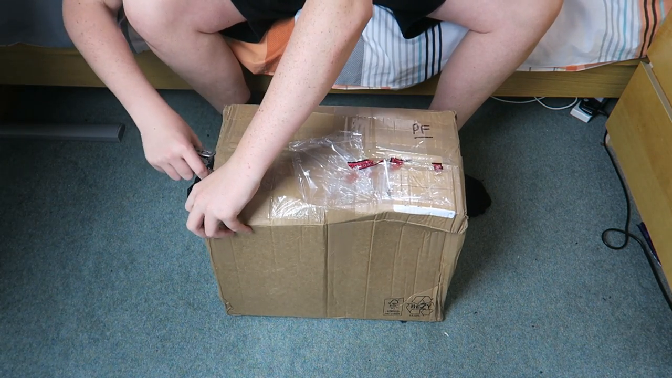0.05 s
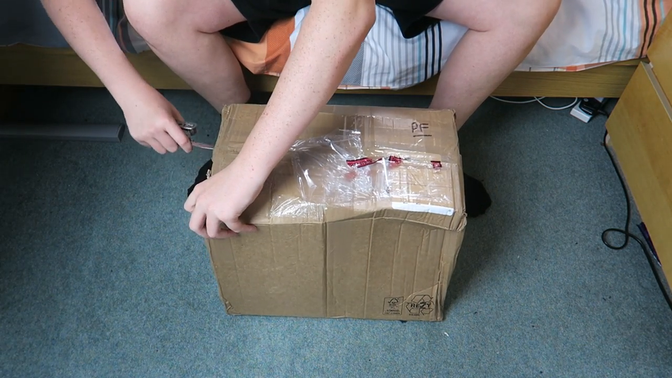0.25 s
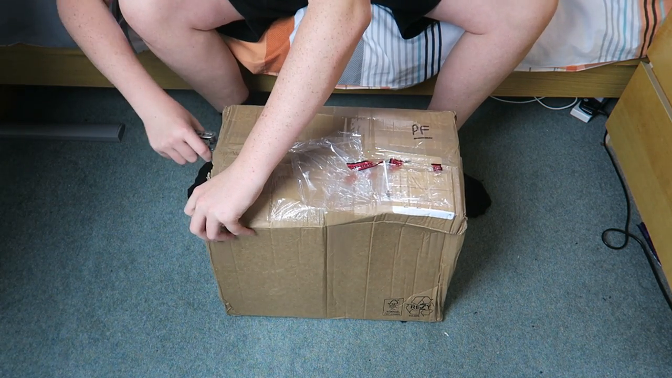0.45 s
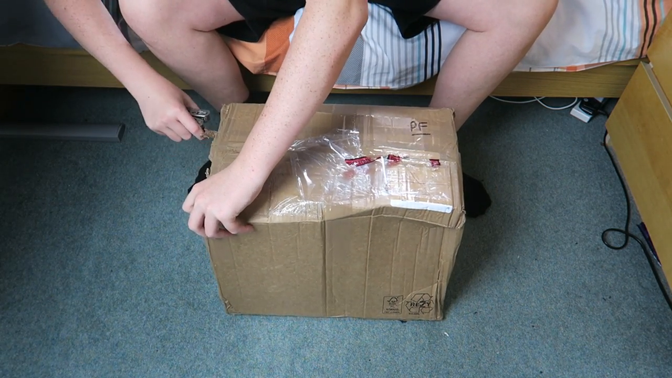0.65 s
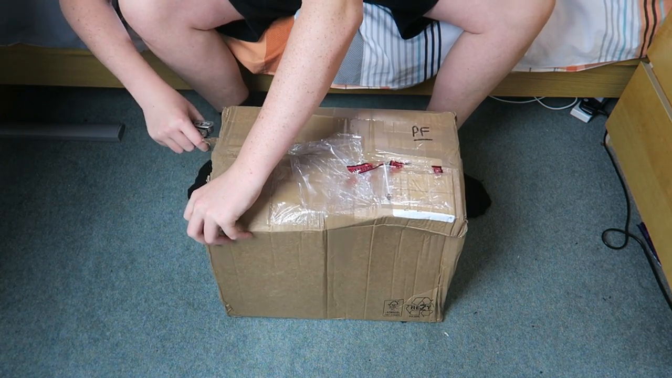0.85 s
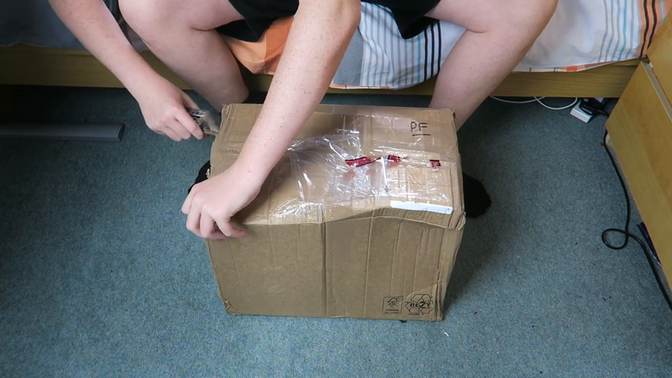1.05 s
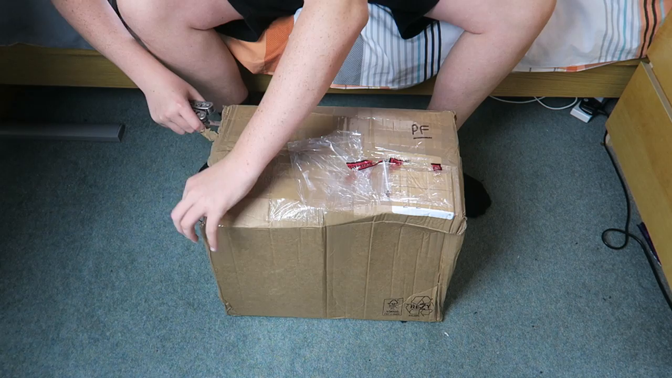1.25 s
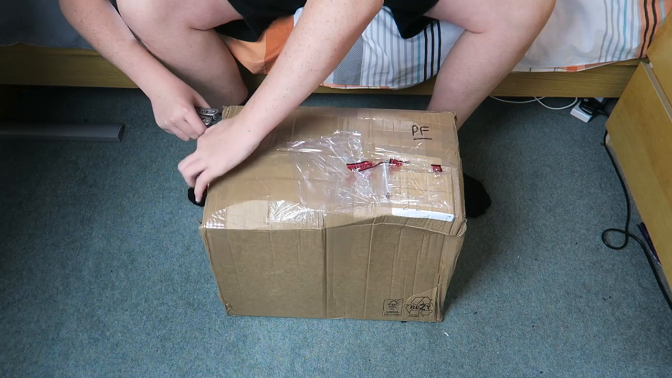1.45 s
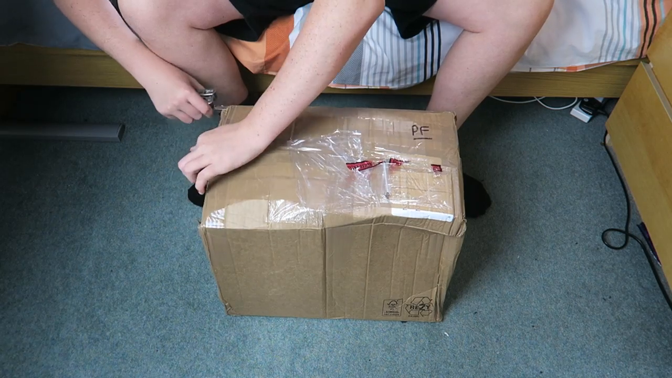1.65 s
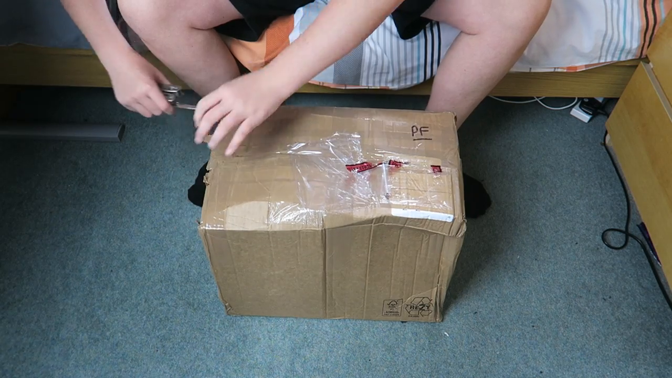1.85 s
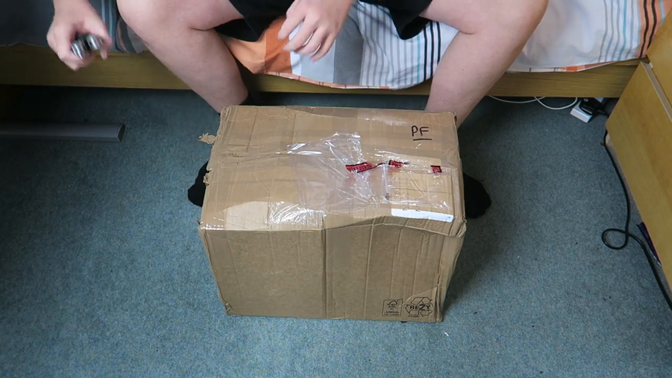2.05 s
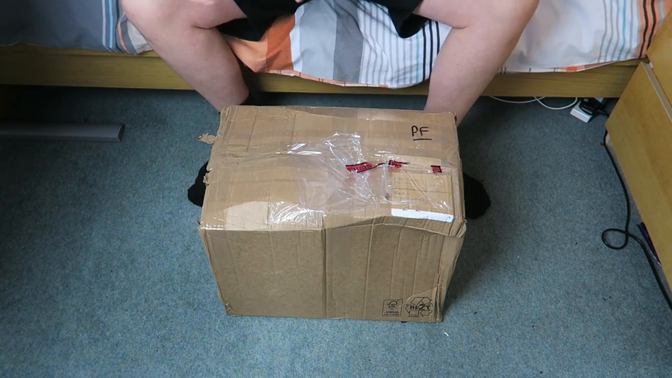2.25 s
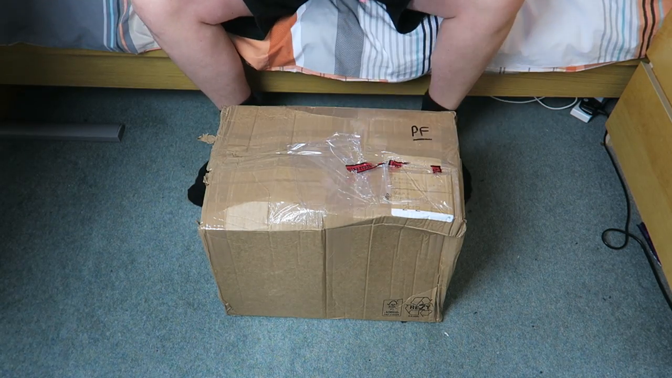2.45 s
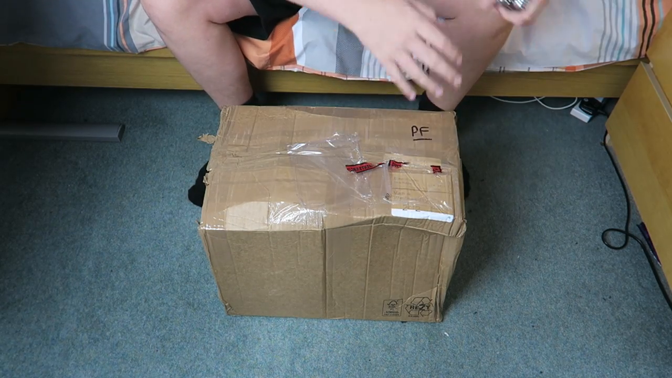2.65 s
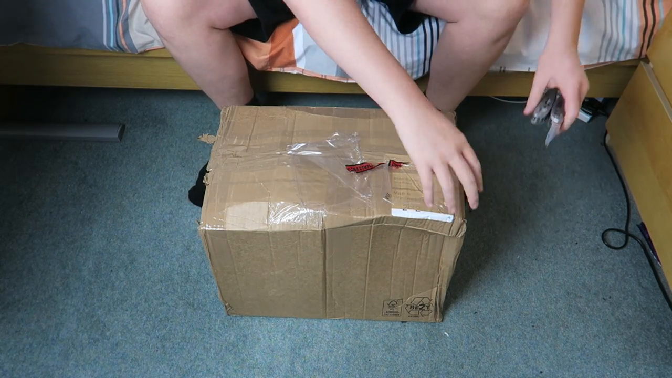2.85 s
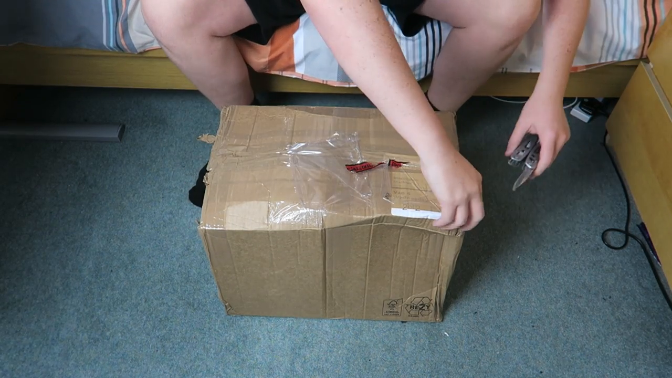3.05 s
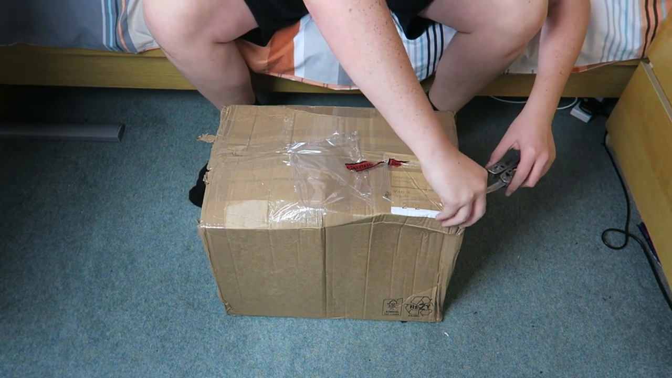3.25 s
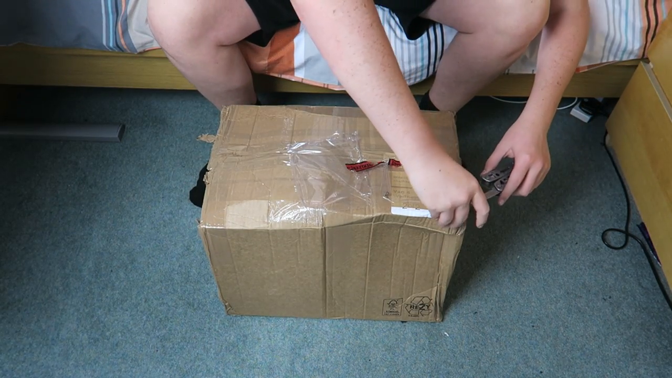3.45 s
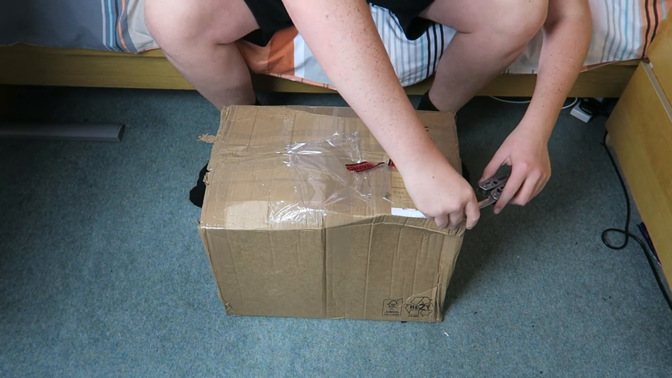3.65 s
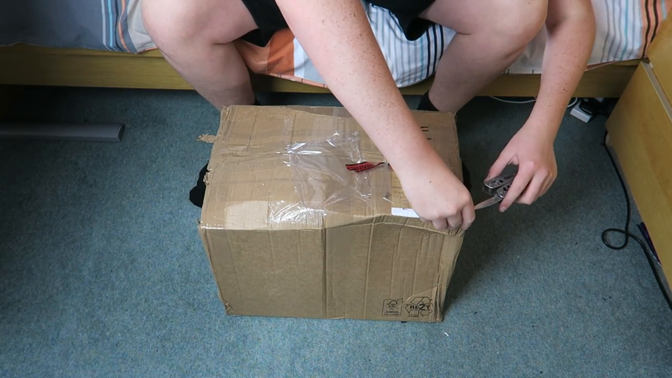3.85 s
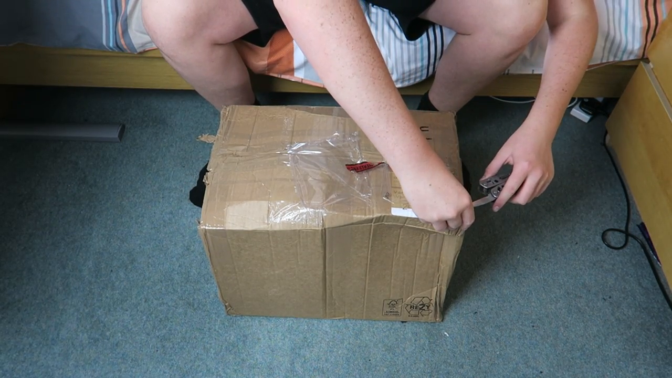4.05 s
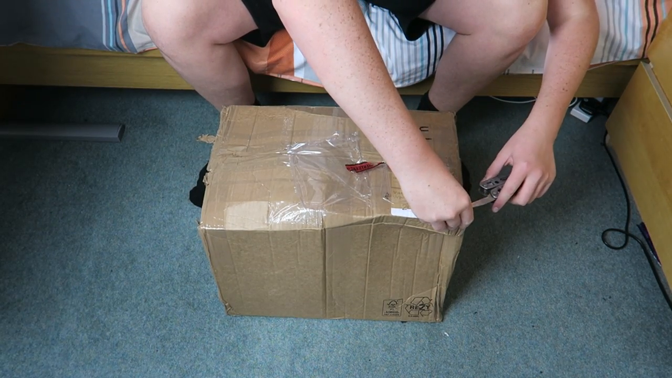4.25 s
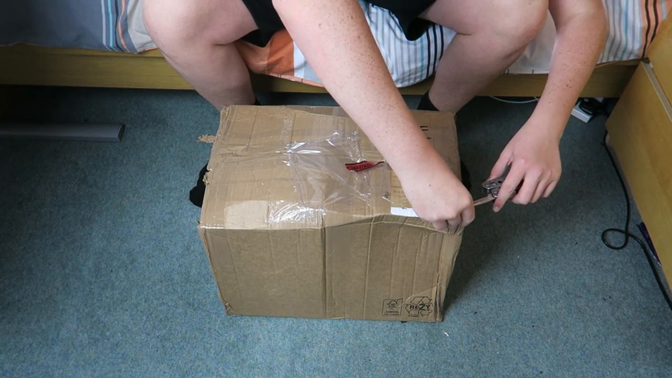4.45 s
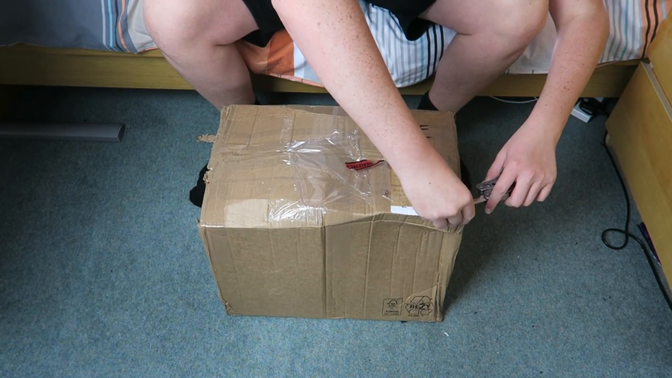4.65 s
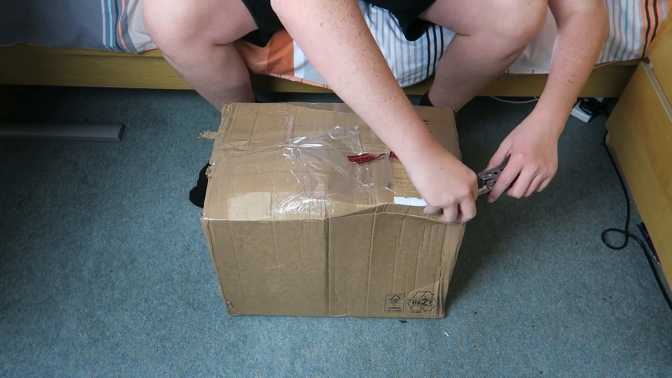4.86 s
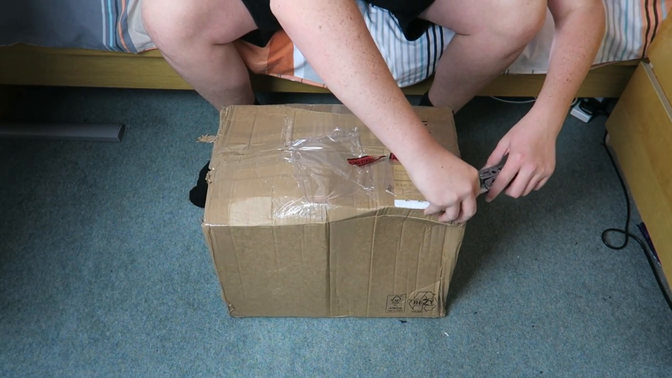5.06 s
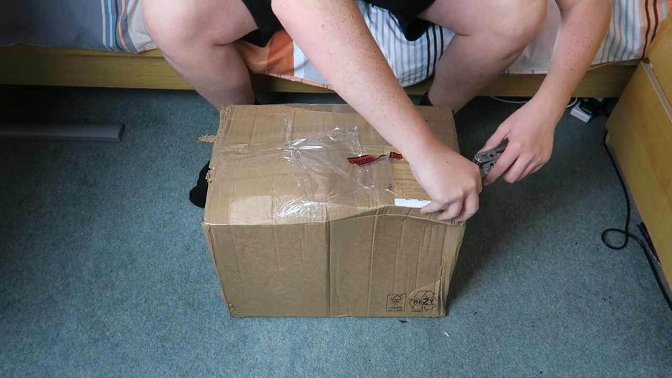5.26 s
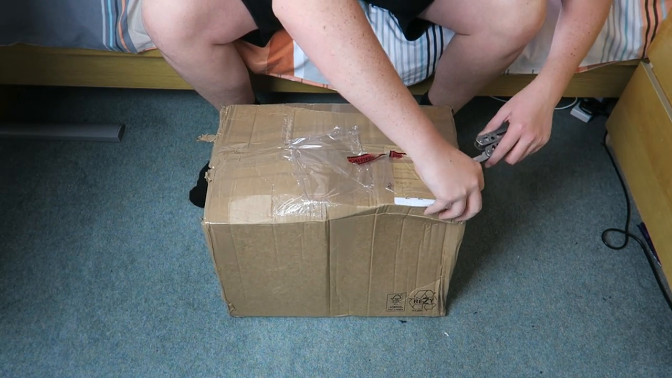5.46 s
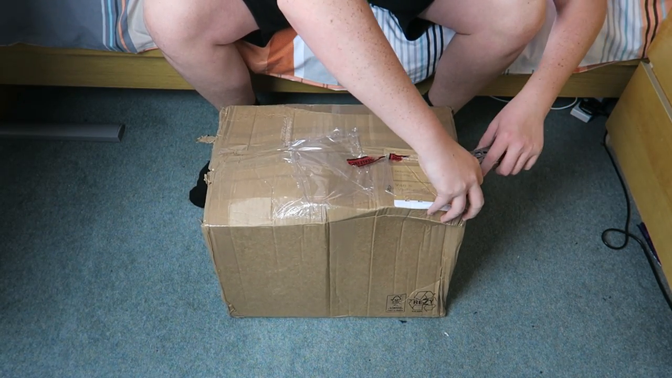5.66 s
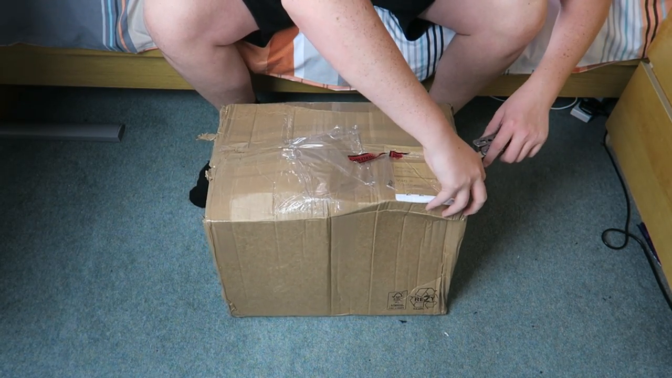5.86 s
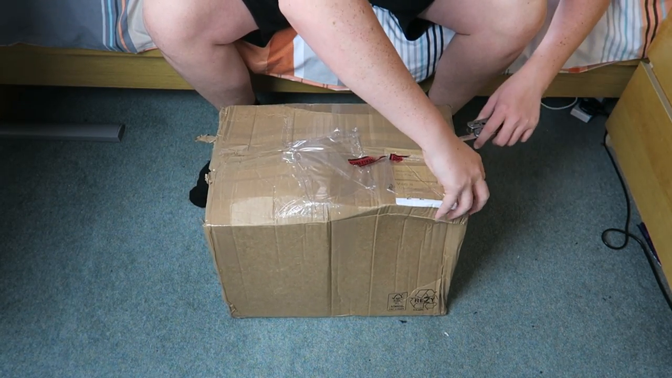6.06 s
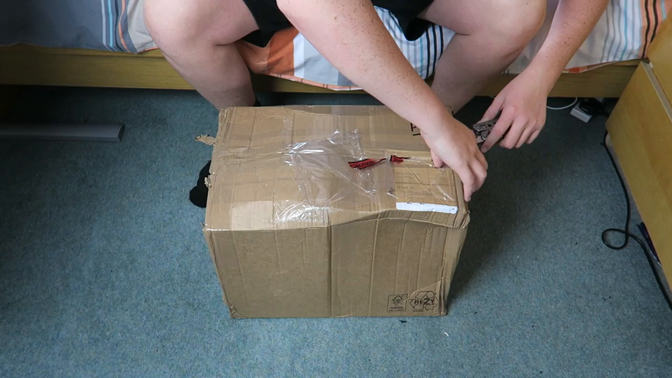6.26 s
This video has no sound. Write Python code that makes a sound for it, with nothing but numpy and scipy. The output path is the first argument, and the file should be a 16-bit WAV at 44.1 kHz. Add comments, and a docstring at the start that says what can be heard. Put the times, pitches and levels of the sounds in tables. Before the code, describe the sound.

Close in a carpeted bedroom, a small blade saws tape on a cardboard box in rough, irregular rasps with crisp snaps, hollow knocks and tiny squeaks. It stops; a foot brushes the carpet softly and hands faintly rustle and bump the box. Then the cutting resumes in short tearing bursts, ending with a strong snap and thump. Faint room hush and hiss; close stereo microphone.

```python
"""Cutting tape on a box, carpeted bedroom

A small blade saws through packing tape on a cardboard box, first at the left end, then at the right, heard in stereo.
Each stroke is a run of tiny slips that rasp in the board, fizz in the tape and drum on the hollow box.
Noise bursts through a strip resonance make the tape snaps; brief wavering tones make the blade squeaks.
Between the cuts a foot drags over the carpet, and hands take a new grip, rustling on the tape and bumping the box.
Room reflections, a quiet hush, microphone hiss, low hum and thin whine lie around these sounds."""
import sys
import numpy as np
from scipy import signal
from scipy.fft import rfft, irfft, next_fast_len
from scipy.io import wavfile
from scipy.ndimage import uniform_filter1d, map_coordinates

SR = 44100
rng = np.random.default_rng(int(sys.argv[2]) if len(sys.argv) > 2 else 0)


def put_to_file(sound):
    """Save the sound as 16-bit audio at rate SR, in the file named by the first command-line argument."""
    columns = np.atleast_2d(sound).T  # one column per channel
    safe = np.clip(columns, -1, 1)
    whole_steps = np.round(safe * 32767)
    wavfile.write(sys.argv[1], SR, whole_steps.astype(np.int16))


N = 278712  # length in samples

# foot dragging on the carpet: time_s, level_db
FOOT_DRAG = [(2.33, -65), (2.4, -51.5), (2.476, -46), (2.586, -45.5), (2.68, -59)]
# clearest snaps of tape and fibres; peaks before the side colouring, tick before TICK_GAIN_DB:
# start_s, strip_peak_db, strip_pitch_hz, board_crack_db, bright_tick_db
CLEAR_SNAPS = [(0.0124, -14.5, 2970, -24, -44), (0.1012, -26, 1770, -19.5, -51),
               (0.177, -20.5, 2700, -28, -43), (0.183, -19, 2640, -21.5, -36),
               (0.236, -15.5, 1560, -13.5, -35), (0.3626, -20, 1490, -18, -53),
               (0.507, -40, 2700, -44, -62), (0.5962, -18.5, 2300, -21.5, -58),
               (0.6475, -13.5, 1920, -19, -31), (0.6655, -20, 2400, -28, -48),
               (0.6895, -16.5, 2900, -19, -42), (0.8569, -30, 2460, -29, -36),
               (0.8908, -33, 3030, -40, -40), (1.0329, -15.5, 2700, -31, -51),
               (1.1464, -31, 2100, -36, -34.5), (1.1949, -13.5, 1385, -18, -46),
               (1.2135, -16, 2280, -24, -50), (1.563, -28, 1900, -36, -41), (1.8292, -28, 2630, -38, -35.5),
               (1.918, -30, 1300, -38, -50), (2.2015, -43, 3230, -50, -52), (3.1612, -35.5, 4930, -46, -43),
               (3.244, -40, 2440, -48, -74), (3.393, -40, 1230, -40.5, -72), (3.462, -35.5, 2980, -40, -51),
               (4.4784, -42, 2020, -41, -75), (4.5617, -24, 1980, -27, -46),
               (4.574, -20.5, 3200, -27.5, -41), (4.8156, -35, 1570, -41, -74),
               (4.996, -31, 2100, -31, -58), (5.3066, -39, 2560, -22, -53), (5.388, -28, 2500, -17, -40),
               (5.5808, -19.5, 2220, -41, -40.5), (5.6845, -29.5, 2830, -32.5, -62),
               (5.8435, -39, 2870, -40, -30.5), (5.879, -26, 1800, -24.5, -54),
               (5.9595, -20, 2200, -32, -54), (6.055, -13.5, 2000, -13, -50), (6.1075, -27, 1570, -16, -29)]
# blade breaking through or hand bumping the box; scuff and sway relative to the knock level:
# start_s, level_db, scuff_db, sway_db, scuff_pitch_hz
BOX_KNOCKS = [(0.288, -17.5, 0, -15, 490), (0.364, -14, -5.5, -22, 507), (0.522, -29, -3, -20, 493),
              (0.664, -24, 6.5, -28, 597), (0.696, -11.5, -8, -28, 505), (0.708, -16, -9, -18, 500),
              (1.074, -18, -23, -23, 500), (1.193, -21, 8.5, -19, 600), (1.215, -12.5, -8, -17, 487),
              (1.473, -23, -11.5, -12, 500), (1.755, -21, -12, -26, 500), (2.266, -47.5, 6.5, -16, 680),
              (2.692, -43.5, 5, -22, 560), (3.1, -36, -8, -15, 593), (3.122, -37, -6, -25, 805),
              (3.395, -32, -8, -20, 497), (3.8, -36, -7, -30, 650), (3.845, -36.5, -9, -27, 620),
              (4.093, -41.5, 2, -19, 716), (4.575, -19, -4.5, -29, 516), (4.88, -32, 1, -28, 518),
              (5.357, -14, -5.5, -33, 500), (5.582, -43, 16, -28, 533), (5.881, -31.5, 5, -15, 465),
              (6.063, -8.5, -4.5, -14, 597)]
# blade sticking in the tape: centre_s, level_db, pitch_hz
BLADE_SQUEAKS = [(1.516, -24, 2262), (1.711, -21.5, 2810), (1.867, -18.5, 2317), (5.908, -27.5, 2230),
                 (6.219, -35.5, 1950)]
# panels and air of the box, gain before the bass loss: pitch_hz, width_hz, gain_db
BOX_MODES = [(35.6, 4.3, -20), (149, 14, 7.5), (312, 19, -5), (374.4, 17, -4), (434, 19.7, -0.5),
             (532, 11, -6), (613, 7.4, -8), (680, 10, -11.5), (740, 8.9, -10.5), (867, 19, -11),
             (1301, 19, -10)]
# colour of the board: pitch_hz, relative_db
BOARD_COLOUR = [(250, -5), (550, 3.5), (800, 2), (1050, 4.5), (1500, 8), (2200, 8), (3150, 5), (3650, 0),
                (5000, -8.5), (7000, -17), (12000, -34.5), (15500, -64.5)]
# colour of the tape: pitch_hz, relative_db
TAPE_COLOUR = [(2000, 19), (4300, 26), (6000, 20), (8500, 15), (12300, 18), (14000, 13), (16000, 2)]
# colour of a sock on carpet: pitch_hz, relative_db
CARPET_COLOUR = [(88, -28), (150, 5.5), (401, -6), (578, 3), (674, -4.5), (1870, 2), (15000, -35)]
# colour of room hush and microphone hiss: pitch_hz, relative_db
QUIET_COLOUR = [(15, -48), (25, -13.5), (119, -9.5), (260, -9.5), (648, -13.5), (1110, -16.5),
                (1450, -20.5), (1750, -19.5), (10600, -40.5), (15500, -48)]
# low hum and thin whine, level around which each wavers: pitch_hz, level_db
HUM_AND_WHINE = [(59.7, -69.5), (10853, -84)]
# decay of the bedroom: pitch_hz, t60_s
ROOM_DECAY = [(150, 0.16), (500, 0.4), (2000, 0.11), (6000, 0.4), (14000, 0.13)]
# side gain by pitch, nearly mono in the middle pitches: pitch_hz, side_gain_db
SIDE_GAIN = [(60, -28), (300, -10.5), (800, -24), (2600, -42), (4200, -6.5), (6500, -2), (14000, 1)]
# left-right colour of the microphones: pitch_hz, left_minus_right_db
MICROPHONE_COLOUR = [(90, -1.5), (210, 2.5), (320, 3), (470, 6), (510, -0.5)]
# bending waves running through the board: pitch_hz, t60_s
BOARD_DECAY = [(200, 0.042), (2000, 0.045), (12000, 0.018)]
# stereo width of the hush and hiss: pitch_hz, side_gain_db
QUIET_WIDTH_GAIN = [(40, -21), (160, 4), (380, 7.5), (700, 2.5), (2000, -1), (12000, 1.5)]
# colour of skin or blade on the box face: multiple_of_scuff_pitch, relative_db
SCUFF_COLOUR = [(.3, -21.5), (1, 9), (1.6, 2), (2.8, -6.5), (5.6, -20), (12, -61)]
# colour of the box rocking on the carpet: pitch_hz, relative_db
SWAY_COLOUR = [(15, -3), (33, -3.5), (55, -5), (95, -13.5), (140, -11.5), (400, -80)]
# pushes of the blade and, between cuts, rubs of the hands; levels before the balance in cutting():
# full_force_s, rise_s, hold_s, board_rasp_db, box_drumming_db, tape_fizz_db
BLADE_STROKES = [(0.0, .01, 0.0045, -20, -19.5, -23), (0.055, .03, 0.15, -31.5, -34.5, -40),
                 (0.17, 0.034, 0.0091, -28, -38, -30.5), (0.255, 0.053, 0.12, -27, -24, -39),
                 (0.546, 0.24, 0.14, -34, -35.5, -61), (0.686, 0.076, 0.031, -21.5, -20.5, -27),
                 (0.848, 0.014, 0.13, -39, -39, -43.5), (1.036, 0.035, 0.17, -36, -37, -38),
                 (1.189, 0.008, 0.033, -25, -22.5, -37), (1.305, 0.058, 0.2, -40, -39.5, -49),
                 (1.547, 0.079, 0.011, -27, -47.5, -31.5), (1.626, 0.028, .05, -27.5, -33, -53),
                 (1.676, 0.088, 0.06, -24.5, -29, -46), (1.776, .05, 0.034, -34, -35.5, -44),
                 (1.845, 0.094, 0.032, -27.5, -35, -37), (2.768, 0.061, 0.39, -58.5, -63, -84),
                 (3.126, 0.033, 0.044, -50, -47.5, -47), (3.23, 0.045, 0.069, -55, -50.5, -72),
                 (3.466, 0.073, 0.32, -53.5, -56.5, -78), (3.732, 0.04, 0.18, -72, -55.5, -83),
                 (4.569, 0.012, 0.025, -34, -32, -45), (4.654, 0.076, 0.069, -31, -31, -40),
                 (4.893, 0.05, 0.028, -41.5, -45.5, -49), (5.017, 0.066, 0.0078, -29, -33.5, -35.5),
                 (5.191, 0.073, 0.027, -38, -40.5, -42.5), (5.329, 0.037, 0.1, -21.5, -26.5, -28),
                 (5.437, 0.057, 0.027, -27, -26.5, -40), (5.594, 0.056, 0.16, -40, -44.5, -46),
                 (5.842, 0.0096, 0.073, -38, -60, -29.5), (5.971, 0.052, 0.09, -25.5, -27.5, -38),
                 (6.062, 0.018, 0.052, -24, -23, -36), (6.184, .012, 0.028, -42, -34.5, -33),
                 (6.25, .05, 0.079, -50, -44, -51)]
# fingertips sliding over the tape: full_force_s, rise_s, hold_s, level_db
FINGER_RUBS = [(1.03, .006, 0.021, -61), (3.124, .02, .02, -57.5), (3.154, .01, 0.014, -53),
               (3.458, 0.034, 0.018, -52), (3.52, .05, 0.21, -64), (3.604, .01, 0.016, -55)]
# colour of fingertips on film: pitch_hz, relative_db
FINGER_COLOUR = [(1500, -14), (3500, 5), (5800, -2), (9000, -15), (14000, -24)]
# lid held at the left end, held at the right end, then pulled free; pitch before bending by the hand:
# start_s, pitch_hz, gain_db
LID_MODES = [(0, 228, 6.5), (2.8, 214, 5.5), (5.82, 213, 8.5)]

SAG_DB_PER_S, RELEASE_DB_PER_S = 1.5, 248  # the force eases during a stroke, then dies away
CRACKLE_PER_S, CRACKLE_DB, CRACKLE_SPREAD_DB = 36, -9.5, 5  # level relative to the rasp gain
CRACKLE_HZ, CRACKLE_OCTAVES = 2160, 0.71  # central pitch and standard deviation
CRACKLE_BOARD_DB, CRACKLE_TICK_DB = 4, -25  # relative to the strip; tick before TICK_GAIN_DB
TICK_GAIN_DB = 6.5
ROCK_DB = -21  # rocking under a stroke, relative to its box resonance
STRIP_Q, BREAK_AT_S, FLURRY_DB = 1.92, 0.001171, -0.5
PRESS_BEND = 0.04  # largest fractional shift of the lid pitch, either way
LID_WIDTH_HZ, BASS_HZ = 27.4, 76  # lid damping; the small box radiates deep bass poorly
TOP_HZ = 15600


def amp(db):
    """Decibels to gain."""
    return 10 ** (np.asarray(db) / 20)


def unit(x):
    """Scale to rms 1."""
    return x / np.sqrt(np.mean(x ** 2) + 1e-20)


def peaked(x):
    """Scale each channel to peak 1."""
    return x / abs(x).max(axis=-1, keepdims=True)


def even(x, span=0.18):
    """Level each span in seconds to about rms 1, leaving the finer grain."""
    size = int(span * SR)
    power = uniform_filter1d(uniform_filter1d(x ** 2, size), size)
    return x / np.sqrt(abs(power) + 1e-12)


def along(points, hz):
    """Read (Hz, value) points on a log frequency axis."""
    f, v = np.transpose(points)
    return np.interp(np.log(hz + 1), np.log(f), v)


def filtered(x, response):
    """Apply a complex response of frequency, padded for its ringing."""
    m = 2 * next_fast_len(x.shape[-1] // 2 + min(x.shape[-1], SR // 4))
    spectrum = rfft(x, m) * response(np.fft.rfftfreq(m, 1 / SR))
    return irfft(spectrum, m)[..., :x.shape[-1]]


def coloured(x, spectrum):
    """Causal, minimum-phase filter with the given (Hz, dB) shape."""
    def response(hz):
        # folding the cepstrum puts the filter's energy after each impulse
        cepstrum = irfft(np.log(amp(along(spectrum, hz))))
        cepstrum[1:len(hz) - 1] *= 2
        cepstrum[len(hz):] = 0
        return np.exp(rfft(cepstrum))
    return filtered(x, response)


def add(track, s, sound):
    """Mix a sound in at time s."""
    part = track[..., max(0, round(s * SR)):][..., :sound.shape[-1]]
    part += sound[..., :part.shape[-1]]


def decay(t, t60):
    """Gain falling 60 dB in t60 seconds."""
    return np.exp(-np.log(1000) * t / t60)


def wobble(rate):
    """A smooth random curve, rate knots a second."""
    knots = rng.standard_normal(int(N * rate / SR) + 4)
    return map_coordinates(knots, [np.arange(N) * rate / SR])


def burst(t, rise, life):
    """Mid and side noise that swells quickly and falls 60 dB in life seconds."""
    noise = rng.standard_normal((2, len(t)))
    return noise * (1 - np.exp(-t / rise)) * decay(t, life)


def slips(rate, spread_db):
    """Mid and side kicks of varied size and random sign, at shared irregular moments."""
    happens = rng.random(N) < rate / SR
    size = happens * amp(spread_db * np.clip(rng.standard_normal(N), -2, 2))
    return size * rng.choice([-1, 1], (2, N))


def force(s, rise, hold):
    """Gain of one stroke: it swells 20 dB per rise time, eases while held, then is released."""
    t = np.arange(N) / SR - s
    swell_db = 20 * np.minimum(t, 0) / max(rise, .002)
    sag_db = SAG_DB_PER_S * np.clip(t, 0, hold)
    release_db = RELEASE_DB_PER_S * np.maximum(t - hold, 0)
    return amp(np.maximum(swell_db - sag_db - release_db, -200))


def room_tone():
    """Room hush and hiss of the two microphones, with a low hum and a thin whine that waver."""
    t = np.arange(N) / SR
    tones = np.zeros(N)
    for hz, db in HUM_AND_WHINE:
        tones += amp(db + 1.8 * wobble(9.3)) * np.sqrt(2) * np.sin(2 * np.pi * hz * t)
    mid, side = amp(-55.5) * unit(coloured(rng.standard_normal((2, N)), QUIET_COLOUR))
    return np.array([mid + tones, coloured(side, QUIET_WIDTH_GAIN)])


def echoes(x, lives, count=16):
    """Dense reflections with (Hz, t60 s) decay; crossfaded patterns shift as arms and blade move."""
    out, place = np.zeros((2, N)), np.linspace(0, count - 1, N)
    for k in range(count):
        hz, t, z = signal.stft(rng.standard_normal((2, SR // 2)), SR, nperseg=128)
        fading = z * decay(t, along(lives, hz)[:, None])
        tail = signal.istft(fading, SR, nperseg=128)[1]
        near = np.flatnonzero(abs(place - k) < 1)
        part = x[:, near] * np.cos((place[near] - k) * np.pi / 2)
        reflected = signal.fftconvolve(part, tail / np.linalg.norm(tail[0]), axes=1)
        add(out, near[0] / SR, reflected)
    return out


def foot():
    """A sock brushes over countless carpet fibres: dense slips with the carpet's colour."""
    s, db = np.transpose(FOOT_DRAG)
    drag = amp(np.interp(np.arange(N) / SR, s, db, left=-np.inf, right=-np.inf))
    return drag * unit(coloured(slips(rate=5800, spread_db=2.0), CARPET_COLOUR))


def fingers():
    """Dry skin on plastic film: a broad, light rustle of tiny slips."""
    touch = np.max([amp(db) * force(s, rise, hold) for s, rise, hold, db in FINGER_RUBS], axis=0)
    return touch * even(coloured(slips(rate=2700, spread_db=7), FINGER_COLOUR))


def box(x, s, bend):
    """The hollow box rings in its walls and air; place and hand pressure move the lid's resonance."""
    _, lid_hz, lid_db = LID_MODES[sum(s >= row[0] for row in LID_MODES[1:])]
    modes = BOX_MODES + [(lid_hz * (1 + bend), LID_WIDTH_HZ, lid_db)]

    def response(f):
        ringing = sum(amp(db) * 1j * f * w / (c * c - f * f + 1j * f * w) for c, w, db in modes)
        return ringing * (1j * f / (BASS_HZ + 1j * f)) ** 2
    return filtered(x, response)


def knocks(contact=0.00041):
    """A short rough shove (contact in s) rings the box, scuffs its face and rocks it on the carpet."""
    out, t = np.zeros((2, N)), np.arange(SR // 4) / SR
    push = peaked(t * np.exp(-t / contact))  # the same soft pulse in every shove
    for s, db, scuff_db, sway_db, scuff_hz in BOX_KNOCKS:
        shove = burst(t, rise=0.0039, life=0.083) + amp(-3.5) * push
        thud = peaked(box(shove, s, rng.uniform(-PRESS_BEND, PRESS_BEND)))
        scuff_shape = [(ratio * scuff_hz, level) for ratio, level in SCUFF_COLOUR]
        scuff = peaked(coloured(burst(t, rise=0.00034, life=0.13), scuff_shape))
        sway = peaked(coloured(burst(t, rise=0.0074, life=0.38), SWAY_COLOUR))
        add(out, s, amp(db) * (amp(-3.5) * thud + amp(scuff_db) * scuff + amp(sway_db) * sway))
    return out


def squeaks(length=0.0026, chatter_db=-20):
    """The slips lock into a tone for a few milliseconds, with the same tone weaker around it."""
    out, t = np.zeros((2, N)), np.arange(N) / SR
    for s, db, hz in BLADE_SQUEAKS:
        swell = np.exp(-((t - s) / length) ** 2) + amp(chatter_db) * np.exp(-abs(t - s) / 0.014)
        drift = 0.036 * np.cumsum(rng.standard_normal(N))  # wandering phase, radians
        out += amp(db) * swell * np.sin(2 * np.pi * hz * t + drift)
    return out


def strip(x, hz):
    """The broad, dead resonance of a taut strip of tape."""
    def response(f):
        damping = 1j * f * hz / STRIP_Q
        return (damping / (hz * hz - f * f + damping)) ** 3
    return filtered(x, response)


def snaps(rows):
    """Taut tape breaks in a flurry: a dead ring of the strip, a crack in the board and a bright tick."""
    out, t = np.zeros((2, N)), np.arange(SR // 20) / SR
    main_break = np.arange(len(t)) == round(BREAK_AT_S * SR)
    for s, db, hz, crack_db, tick_db in rows:
        flurry = amp(FLURRY_DB) * burst(t, rise=0.00021, life=0.0088)
        ring = peaked(strip(main_break + flurry, hz))
        crack = peaked(coloured(burst(t, rise=0.0019, life=0.015), BOARD_COLOUR))
        tick = peaked(coloured(burst(t, rise=0.0011, life=0.025), TAPE_COLOUR))
        add(out, s, amp(db) * ring + amp(crack_db) * crack + amp(tick_db + TICK_GAIN_DB) * tick)
    return out


def crackle(rasp):
    """Lesser snaps at random moments, scaled by the stroke's rasp; rows like CLEAR_SNAPS."""
    draws = rng.random((int(CRACKLE_PER_S * N / SR), 3))
    at = (draws[:, 0] * N).astype(int)
    size, pitch = np.sqrt(12) * (draws[:, 1:].T - .5)  # uniform, standard deviation 1
    db = 20 * np.log10(rasp[at]) + CRACKLE_DB + CRACKLE_SPREAD_DB * size
    hz = CRACKLE_HZ * 2 ** (CRACKLE_OCTAVES * pitch)
    return np.transpose([at / SR, db, hz, db + CRACKLE_BOARD_DB, db + CRACKLE_TICK_DB])


def effort():
    """Gains of rasp, drumming and fizz; the strongest stroke leads each at every moment."""
    out = np.zeros((3, N))
    for s, rise, hold, *dbs in BLADE_STROKES:
        out = np.maximum(out, amp(dbs)[:, None] * force(s, rise, hold))
    return out


def drumming(x):
    """The box rings grip after grip; it lurches, and the hand slackens and tightens the lid."""
    pressed, parts = np.clip(.5 + .5 * wobble(rate=6), 0, 1), []
    for span in np.split(np.arange(N), [int(row[0] * SR) for row in LID_MODES[1:]]):
        middle_s = span.mean() / SR
        slack = box(x[:, span], middle_s, -PRESS_BEND)
        taut = box(x[:, span], middle_s, PRESS_BEND)
        parts.append(slack + pressed[span] * (taut - slack))
    lurch_db = 1.4 * wobble(22)
    return even(np.hstack(parts)) * amp(lurch_db)


def cutting(rasp, drum, fizz):
    """The edge catches and tears free over and over; the same slips drive board, tape and box."""
    rips = unit(slips(rate=330, spread_db=2.0))
    fibres = unit(slips(rate=12000, spread_db=2.5))
    tearing = unit(echoes(rips + amp(-9.5) * fibres, BOARD_DECAY, count=40))  # smeared by the board
    crinkle = unit(slips(rate=46, spread_db=6))  # single ticks of the plastic film
    board = even(coloured(tearing + fibres, BOARD_COLOUR))
    tape = even(coloured(tearing + amp(-14) * crinkle, TAPE_COLOUR))
    rocking = amp(ROCK_DB) * unit(coloured(fibres, SWAY_COLOUR))
    body = drumming(tearing + amp(6.0) * fibres) + rocking
    judder = amp(2.36 * wobble(55))  # the blade advances in jerks
    return judder * (amp(-0.5) * drum * body + amp(-7.0) * rasp * board + amp(-11.0) * fizz * tape)


def scene():
    """Mix mid and side into left and right, shaping side gain and balance by pitch."""
    rasp, drum, fizz = effort()
    strokes = cutting(rasp, drum, fizz) + knocks() + foot() + fingers()
    squeal = squeaks()
    clicks = snaps(CLEAR_SNAPS) + snaps(crackle(rasp))
    into_room = amp(-10.5) * strokes + amp(-1.5) * clicks + amp(-6.0) * squeal
    mid, side = strokes + clicks + squeal + echoes(into_room, ROOM_DECAY)
    to_ears = np.array([[1, 1], [1, -1]])  # left is mid plus side, right is mid minus side
    pair = to_ears @ np.array([mid, coloured(side, SIDE_GAIN)])
    heard = filtered(pair, lambda hz: amp(np.outer([.5, -.5], along(MICROPHONE_COLOUR, hz))))
    return heard + to_ears @ room_tone()


def record(dry, dull_hz=14300):
    """The pickup's top treble fades, and nothing passes above its band limit."""
    return filtered(dry, lambda hz: (hz < TOP_HZ) / (1 + (hz / dull_hz) ** 20))


dry = scene()
out = record(dry)
put_to_file(out)
```